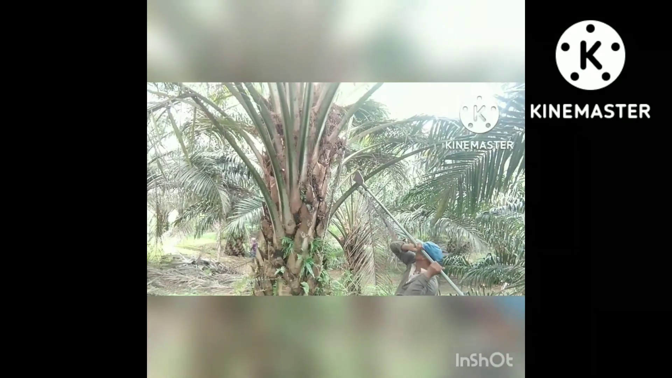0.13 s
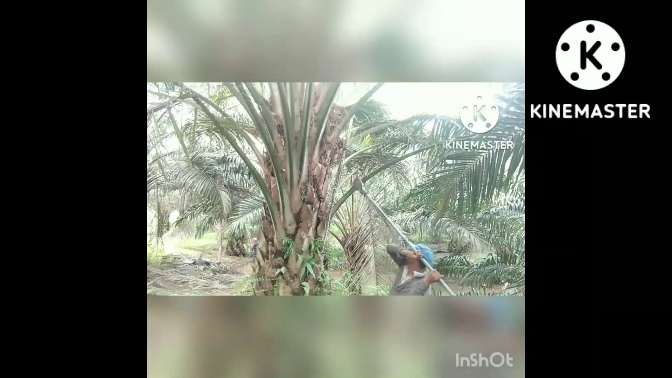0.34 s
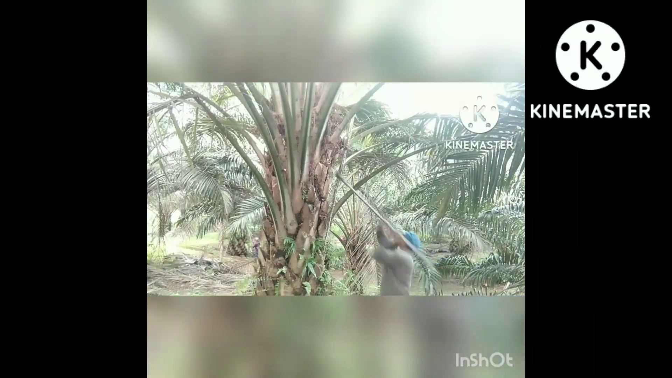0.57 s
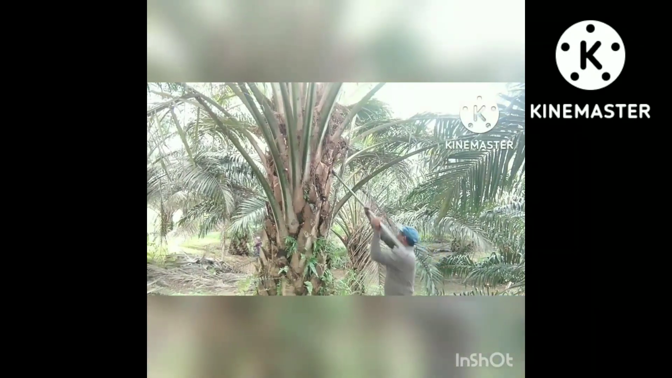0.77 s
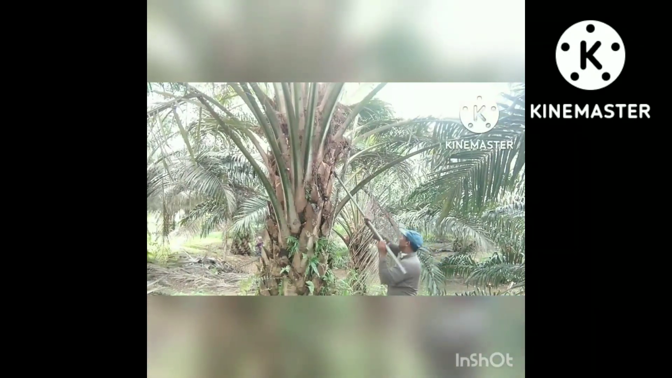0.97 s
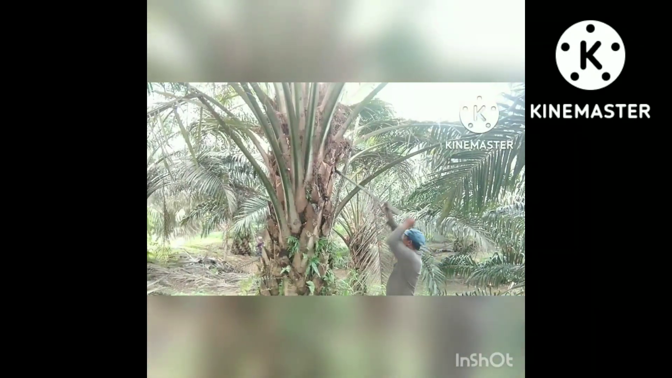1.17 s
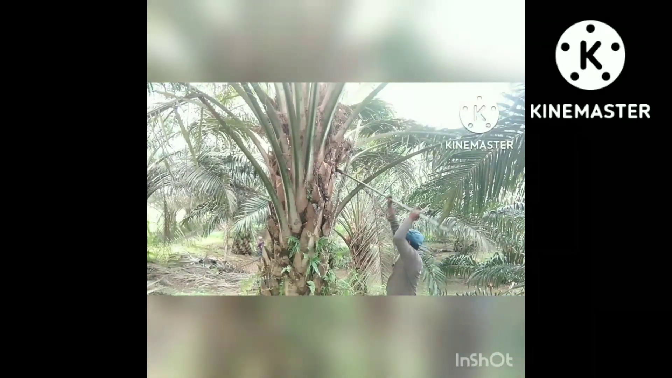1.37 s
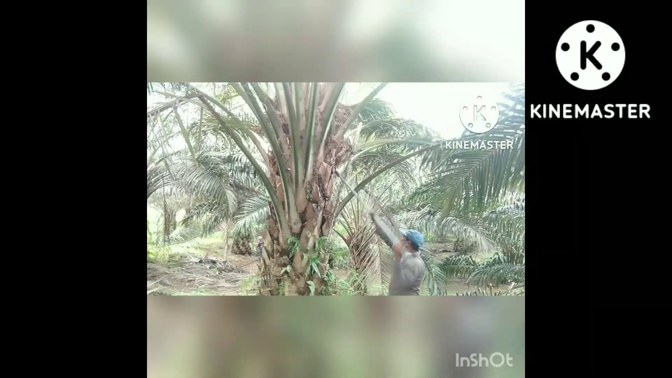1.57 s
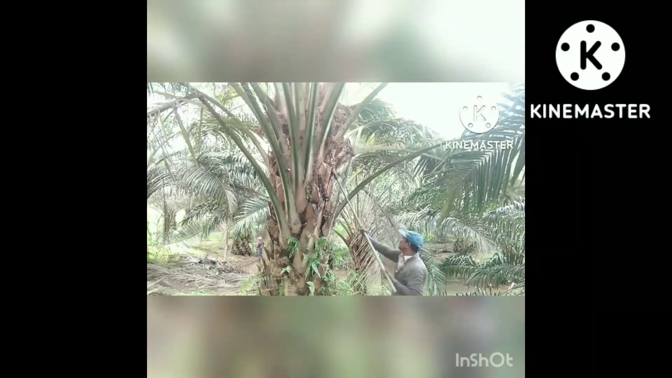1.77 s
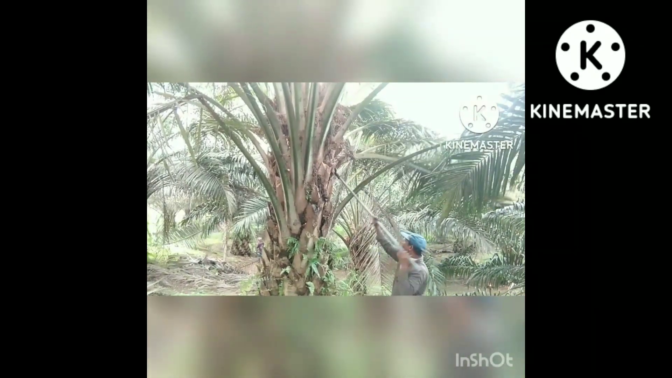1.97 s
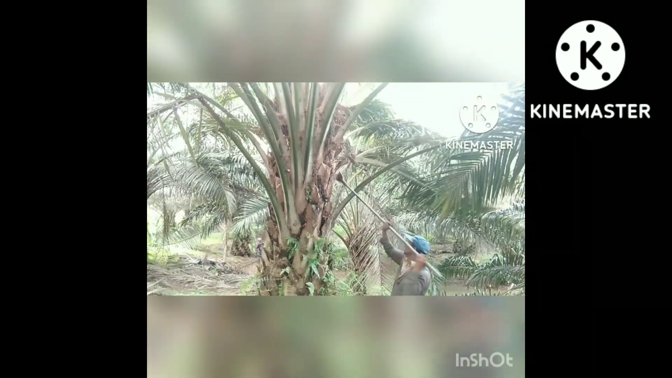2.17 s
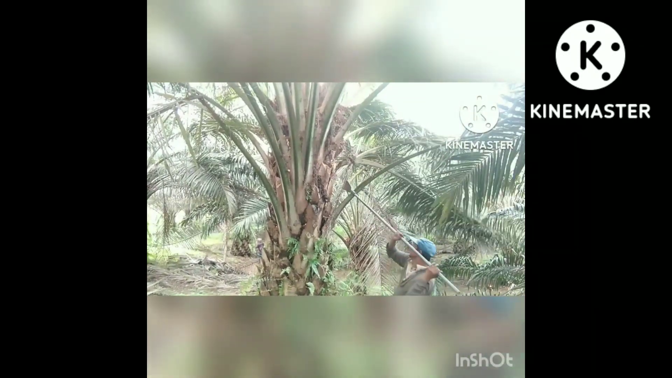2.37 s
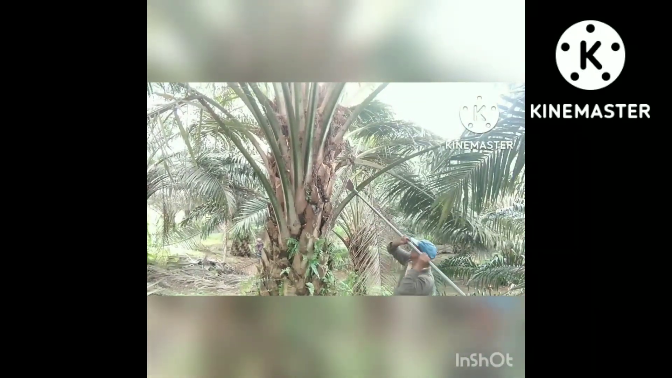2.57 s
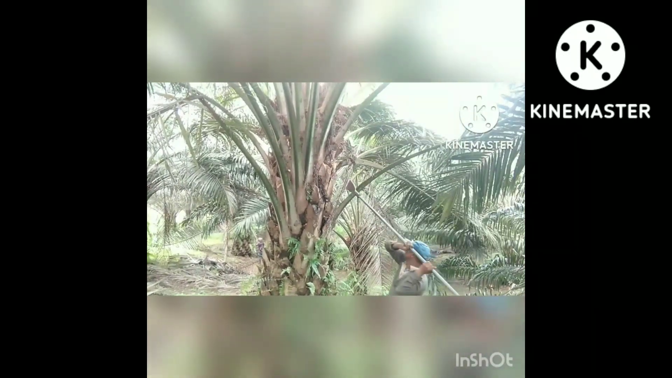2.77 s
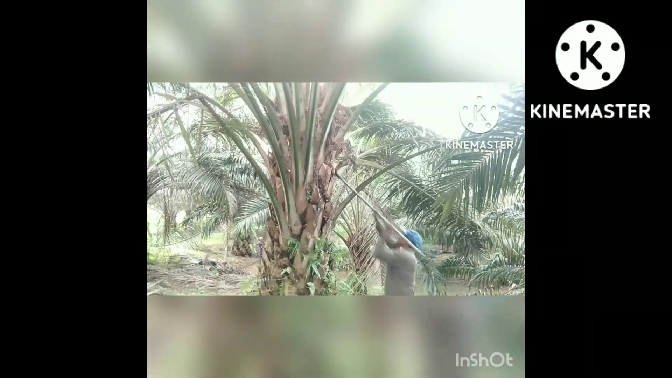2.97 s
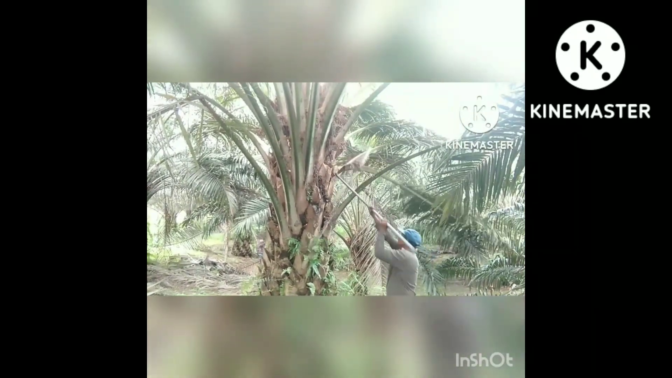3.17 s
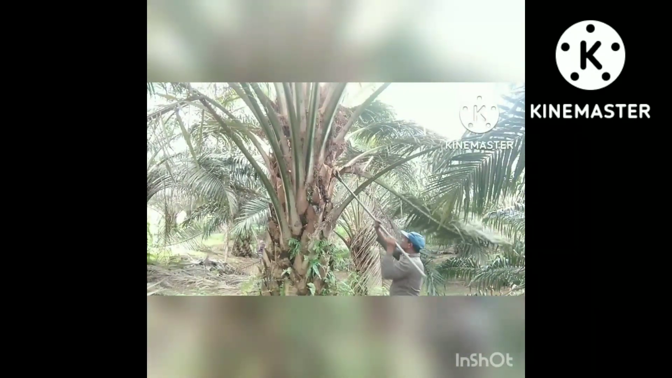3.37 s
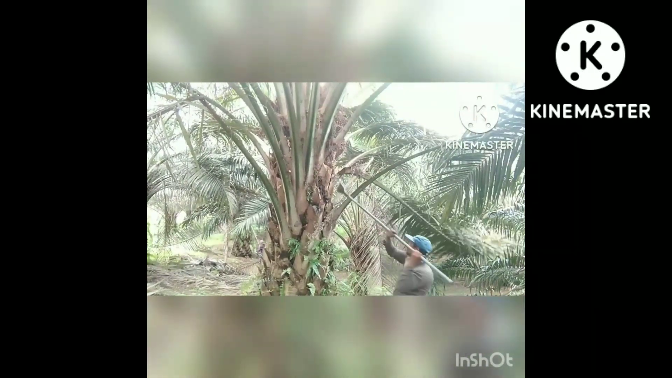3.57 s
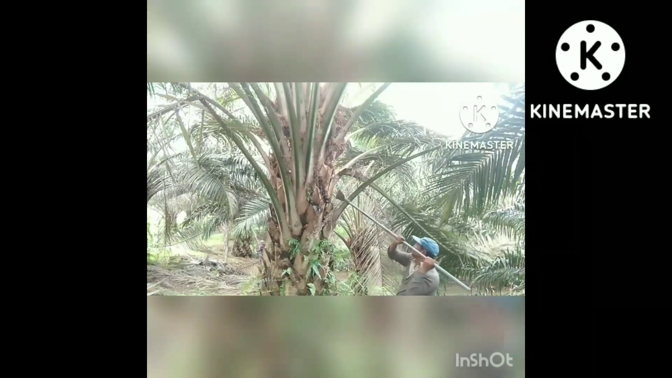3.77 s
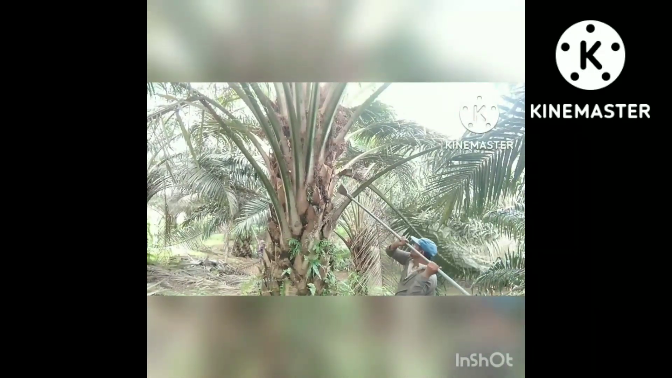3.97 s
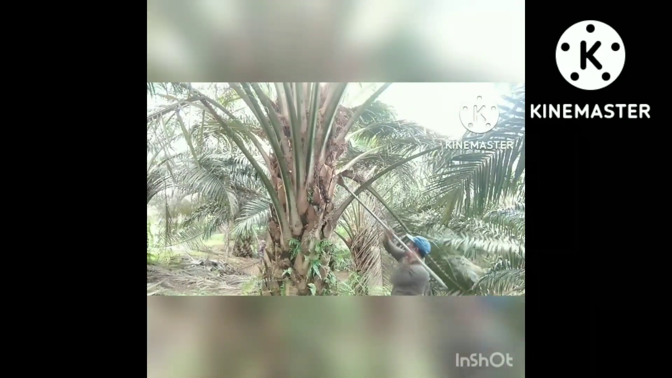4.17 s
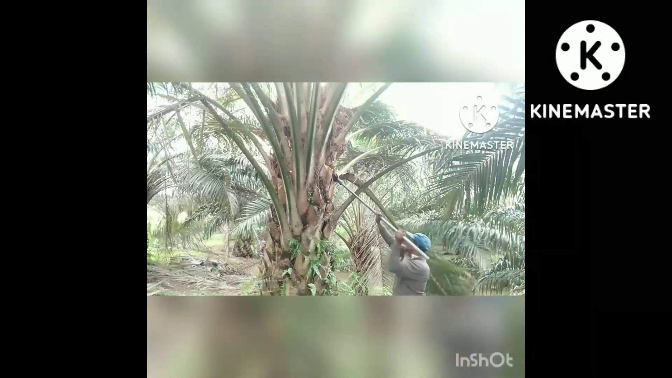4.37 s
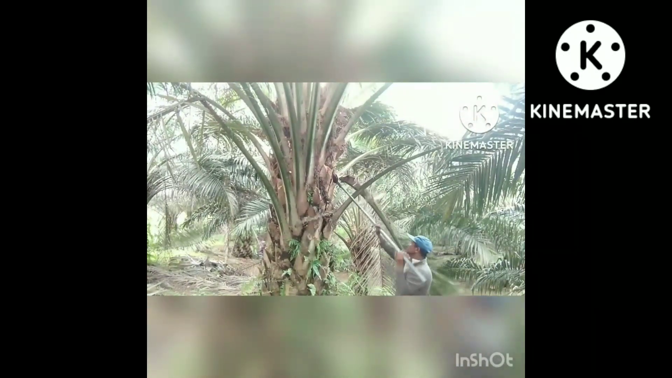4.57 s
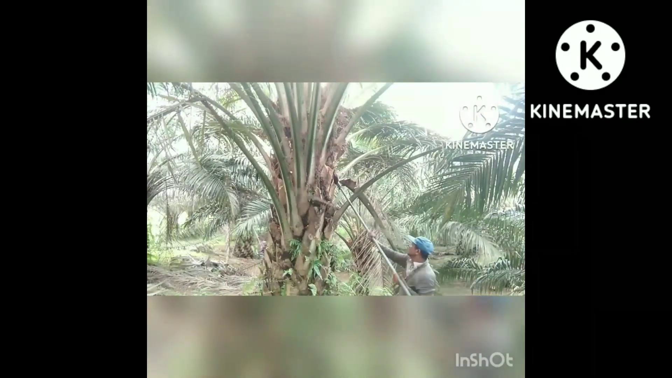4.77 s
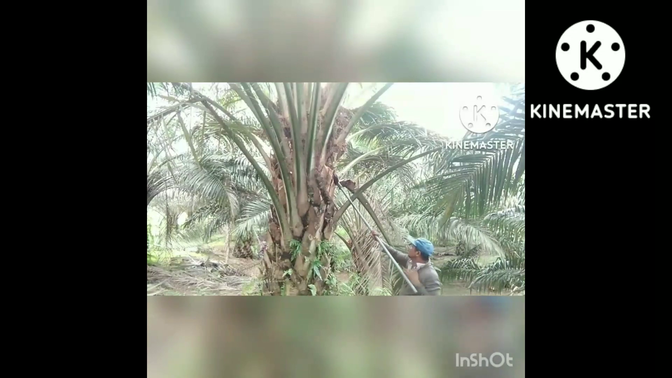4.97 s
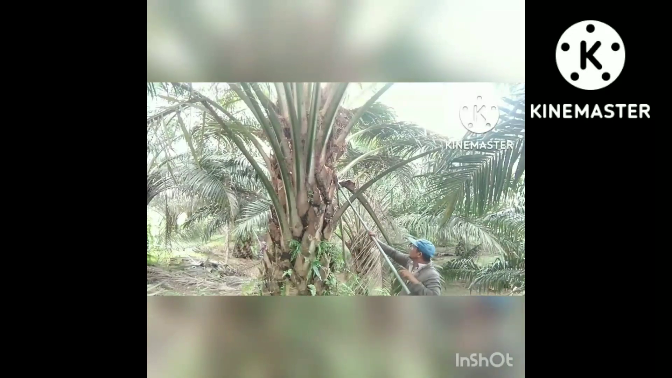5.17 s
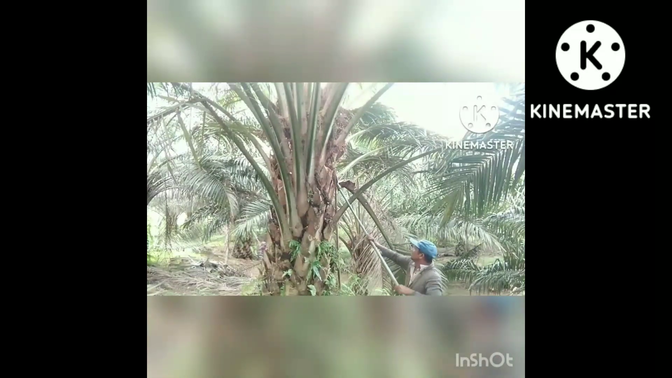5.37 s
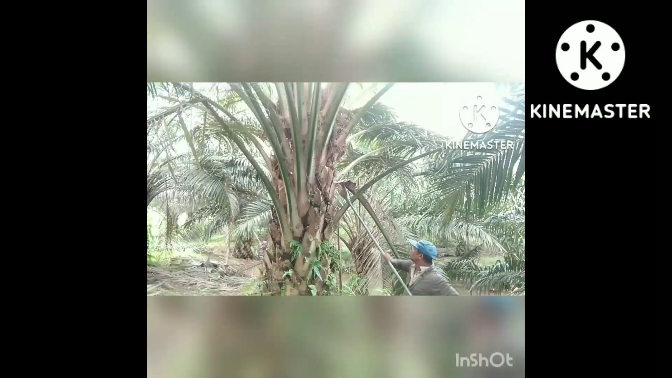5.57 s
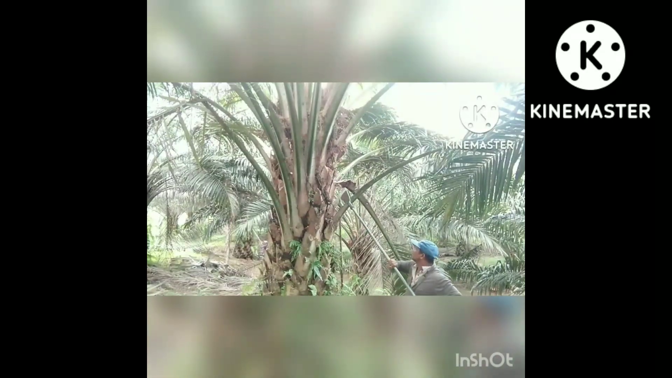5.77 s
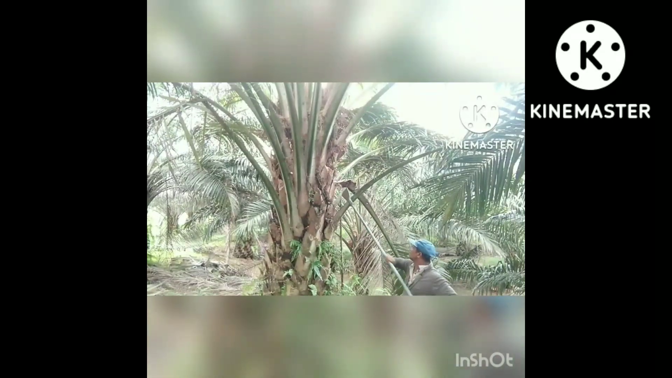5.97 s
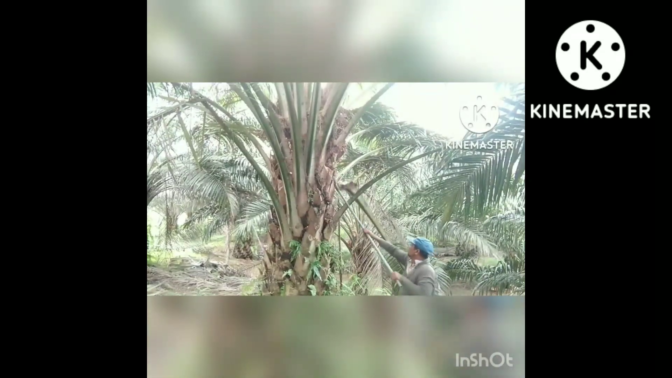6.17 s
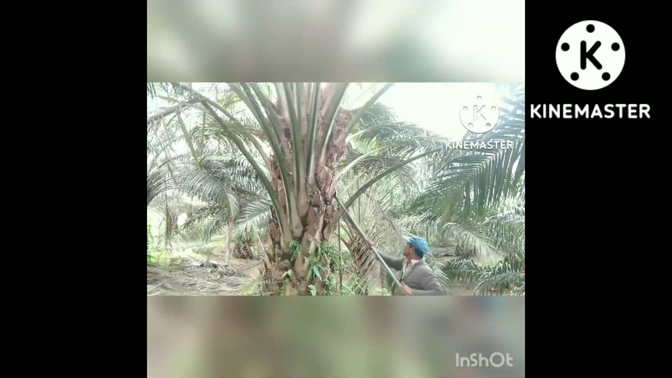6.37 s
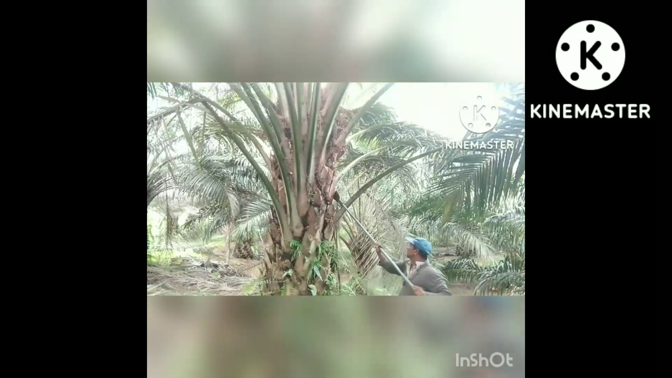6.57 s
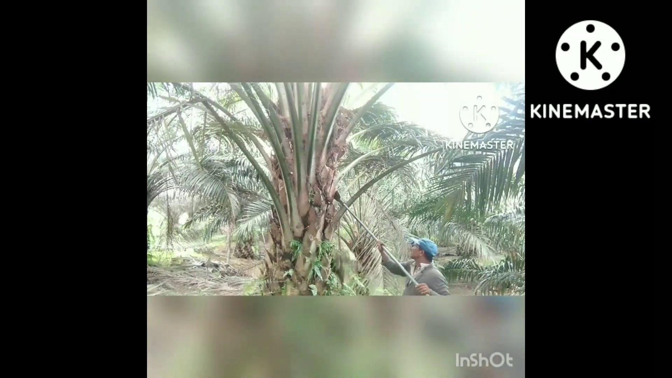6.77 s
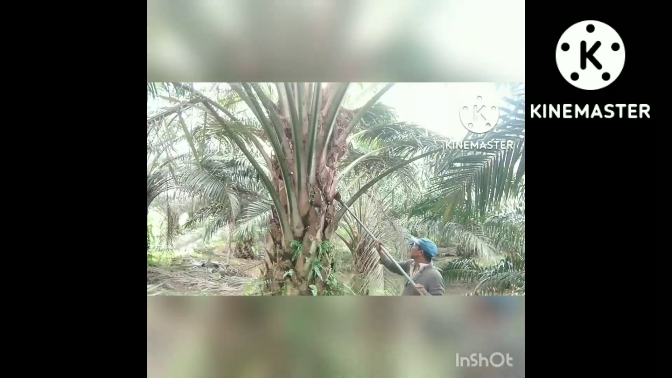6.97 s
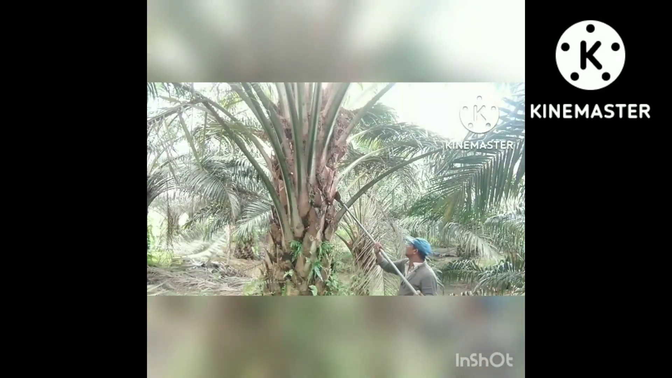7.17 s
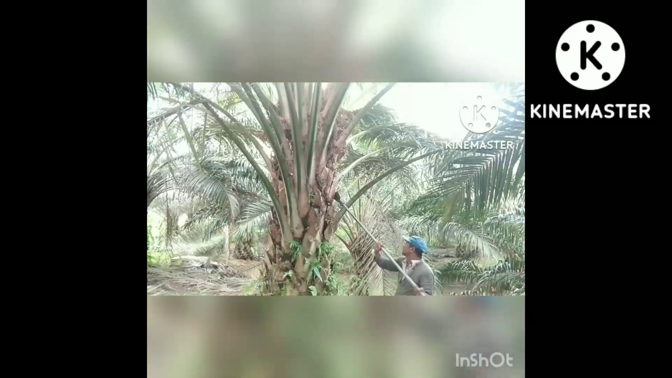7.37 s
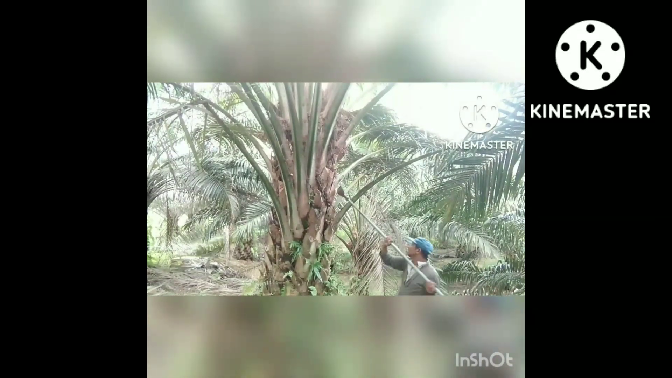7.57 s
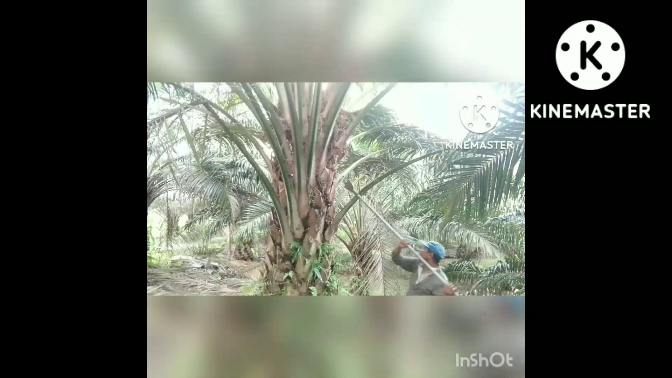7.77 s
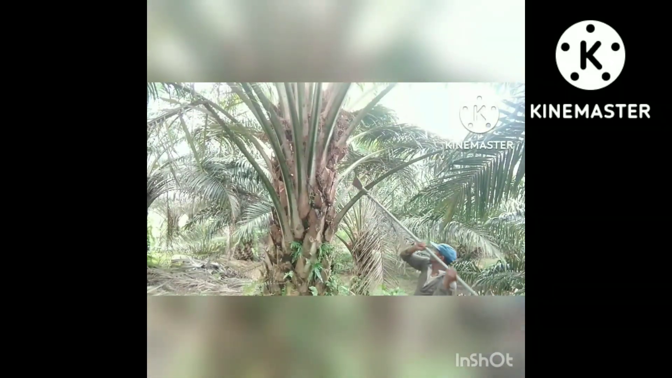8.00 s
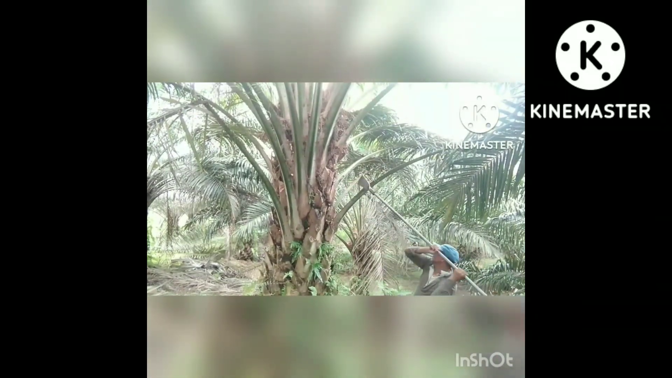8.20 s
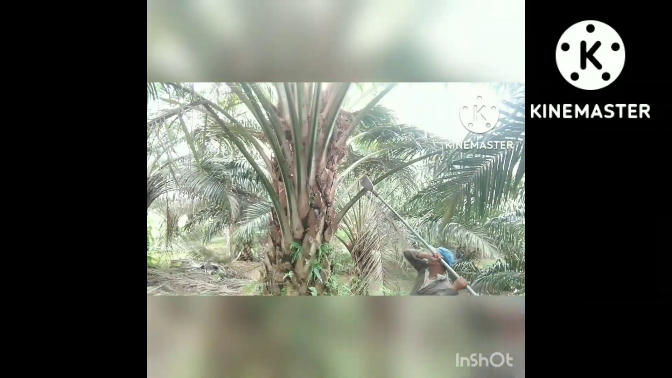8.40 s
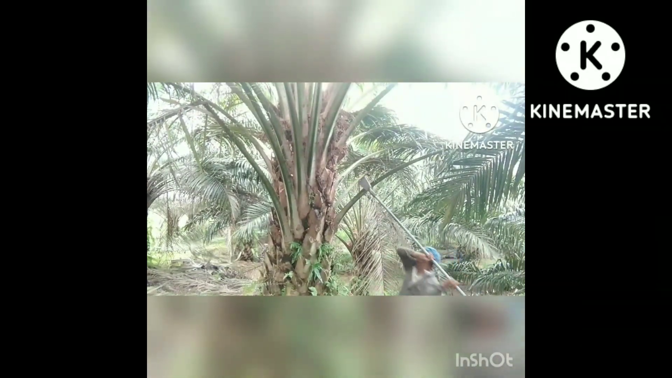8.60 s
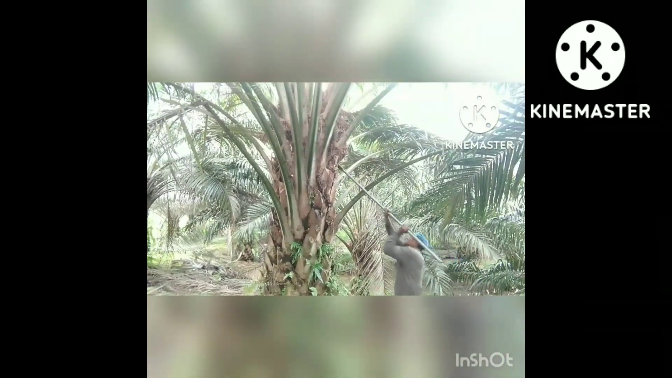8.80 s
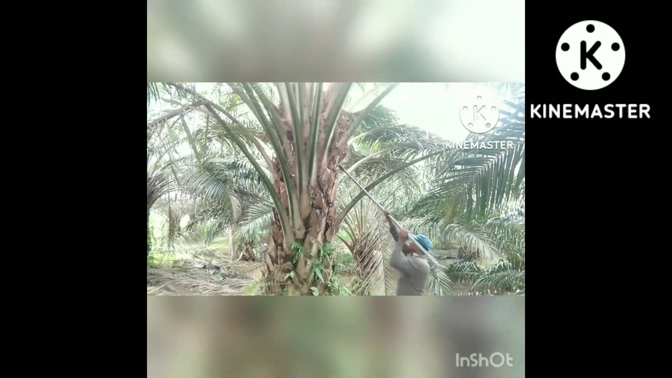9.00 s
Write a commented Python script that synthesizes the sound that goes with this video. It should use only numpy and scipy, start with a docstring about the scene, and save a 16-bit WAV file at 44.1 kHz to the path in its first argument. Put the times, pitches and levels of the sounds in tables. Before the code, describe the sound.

Irregular hacking at palm stalks: tearing cracks, hollow wooden knocks and bursts of crackly leaf rustle, with near-quiet gaps between.

```python
"""Chopping palm fronds

A sickle on a long pole chops palm fronds in a plantation, with insects, air and a low hum behind.
Stalks crack and tear as bursts of breaking fibres; pole and stalks knock as ringing wooden tones.
Dry leaflets rustle and crackle as hiss and tiny ticks while the fronds shake and fall.
A noise suppressor carves the steady bands out of the quiet moments, then the top is cut."""
import sys
import numpy as np
from scipy import signal
from scipy.fft import rfft, irfft, next_fast_len
from scipy.io import wavfile
from scipy.ndimage import uniform_filter1d

SR = 44100
rng = np.random.default_rng(int(sys.argv[2]) if len(sys.argv) > 2 else 0)


def int16_out(signal):
    """Quantize to a 16-bit WAV file."""
    q = np.round(np.clip(np.atleast_2d(signal).T, -1, 1) * 32767)
    wavfile.write(sys.argv[1], SR, q.astype(np.int16))


N = 398663   # length in samples


def amp(db):
    """Decibels to gain."""
    return 10 ** (np.asarray(db) / 20)


def rms_one(x):
    """Scale to unit rms, the average strength."""
    return x / np.sqrt(np.mean(x ** 2) + 1e-20)


def at_hz(points, hz):
    """Read a spectrum table in dB, with straight lines on a log-frequency axis."""
    table_hz, table_db = np.array(points).T[:2]
    return np.interp(np.log(np.maximum(hz, 1)), np.log(table_hz), table_db)


def level_curve(points):
    """Draw straight lines in dB through a (time, level) table, one value per sample."""
    return np.interp(np.arange(N) / SR, *np.transpose(points))


def split(x, order, hz):
    """Split a sound into the parts below and above a pitch."""
    return [signal.sosfilt(signal.butter(order, hz, side, fs=SR, output="sos"), x)
            for side in ("low", "high")]


def bandpass(x, order, edges):
    """Keep only what lies between two pitches."""
    return signal.sosfilt(signal.butter(order, edges, "band", fs=SR, output="sos"), x)


def colour(x, spectrum):
    """Shape a white signal by the spectrum of the table, at rms 1."""
    size = next_fast_len(N)
    gain = amp(at_hz(spectrum, np.fft.rfftfreq(size, 1 / SR)))
    return rms_one(irfft(rfft(x, size) * gain, size)[:N])


def drift(rate):
    """Slow random wander of spread about 1; a higher rate [Hz] wanders faster."""
    step = 40   # samples between the drawn points
    r = np.exp(-2 * np.pi * rate * step / SR)
    draws = rng.standard_normal(N // step + 2002)
    slow = signal.lfilter([1], [1, -2 * r, r * r], draws)[2000:]   # skip the start-up
    return np.interp(np.arange(N) / step, np.arange(len(slow)), rms_one(slow))


def ring(push, hz, t60):
    """Ring like a struck object: a unit click starts a sine of height 1 that falls 60 dB in t60 [s]."""
    r, w = amp(-60 / (t60 * SR)), 2 * np.pi * hz / SR
    return signal.lfilter([0, np.sin(w)], [1, -2 * r * np.cos(w), r * r], push + 1e-18)


def rustle(spectrum, per_s, spread_db, grain_share, flicker_db, cycles):
    """Rubbing hiss plus random ticks of uneven size, each ringing some cycles at one of eleven pitches."""
    sizes = amp(spread_db * np.minimum(rng.exponential(1, N), 4)) * rng.choice([-1, 1], N)
    chance = per_s * amp(5 * drift(14)) / SR   # the ticks come in denser and thinner patches
    ticks = sizes * (rng.random(N) < chance)
    pitches, dealt = np.geomspace(200, 15000, 11), rng.integers(0, 11, N)
    # higher pitches cover wider bands, so they are louder to keep the sum white
    rings = sum(hz * ring(ticks * (dealt == k), hz, cycles / hz) for k, hz in enumerate(pitches))
    hiss = np.sqrt(1 - grain_share) * rng.standard_normal(N)
    white = hiss + np.sqrt(grain_share) * rms_one(rings)
    return colour(white * amp(flicker_db * drift(18.0)), spectrum)


# tone of the far low hum: (frequency [Hz], relative level [dB per Hz])
RUMBLE = [(45, -13), (75, 1), (110, -7.5), (170, -32.5)]


def far_hum():
    """A far low hum: deep noise whose strength wanders slowly."""
    hum = colour(rng.standard_normal(N) * amp(2.0 * drift(6.9)), RUMBLE)
    return amp(-75.5) * hum


# tone of insects and air, also the profile the suppressor has learnt:
# (frequency [Hz], relative level [dB per Hz])
AMBIENCE = [(100, -28), (200, 2), (350, 5.5), (600, -5), (1000, -5), (1700, -2), (2400, -15), (4500, -10.5),
            (5000, -5.5), (5600, 2.5), (6200, -1), (6900, 11.5), (7400, 2.5), (7800, -4.5), (10000, -16.5)]
AMBIENCE_DB = -60.5


def insects_and_air():
    """Insects and air: steady noise, strong in the bands of the table."""
    return amp(AMBIENCE_DB) * colour(rng.standard_normal(N), AMBIENCE)


# tone of the trunk and ground shudder: (frequency [Hz], relative level [dB per Hz])
BOOM = [(30, -35.5), (65, -3.5), (110, -5.5), (170, -5.5), (260, -29)]
BOOM_RISE_S, BOOM_T60_S, DRAG_BOOM_DB = 0.13, 0.33, -20   # rise, decay; level under the scrape


def boom():
    """The deepest part of each chop builds up late and lasts; dragged stalks keep it stirring."""
    t = np.arange(N) / SR
    level = amp(level_curve(STALKS) + DRAG_BOOM_DB)
    for s, db, hold, t60, thud_db, boom_db, wood_db in CHOPS:
        since = np.maximum(t - s, 0)
        rise = 1 - np.exp(-since / BOOM_RISE_S)
        level = level + rise * amp(boom_db - 60 * np.maximum(since - hold, 0) / BOOM_T60_S)
    return level * colour(rng.standard_normal(N) * amp(2.5 * drift(9.0)), BOOM)


# tone of the low scrape: (frequency [Hz], relative level [dB per Hz])
STALK_TONE = [(100, -39.5), (200, -8.5), (350, 0.5), (550, -2), (800, -4.5), (1400, -3.5), (2500, -14),
              (5000, -20)]
# strength of the scrape of stalks dragged past trunk and ground: (time [s], level [dB])
STALKS = [(0.0, -57), (0.05, -51.5), (0.28, -65.5), (0.74, -57.5), (1.03, -59), (1.2, -59.5), (1.4, -51),
          (2.0, -58.5), (2.4, -64.5), (2.9, -71.5), (3.09, -60), (3.13, -53.5), (3.6, -55.5), (4.1, -59),
          (4.6, -50), (5.1, -59), (5.57, -65), (5.7, -73), (6.1, -71.5), (6.15, -47.5), (6.22, -50),
          (6.3, -64.5), (6.7, -48.5), (7.2, -49), (7.52, -58), (7.6, -68.5), (8.4, -67), (8.6, -77),
          (8.89, -61.5), (9.04, -59.5)]
STALK_WANDER_DB = 1.5   # unevenness of the scrape
SCRAPE_DB, SCRAPE_T60_S = -5.5, 0.051   # scrape after a knock: level under it before smoothing, decay


def dragged_stalks():
    """Stalks scrape as low rubbing noise, and a knocked stalk scrapes on for a moment."""
    knocked = np.zeros(N)
    for s, db, hz in KNOCKS:
        knocked[round(s * SR)] = amp(db + SCRAPE_DB)
    after = signal.lfilter([1], [1, -amp(-60 / (SCRAPE_T60_S * SR))], knocked + 1e-18)
    after = uniform_filter1d(after, size=600, origin=299)   # the scrape sets in over some 14 ms
    scrape = amp(level_curve(STALKS) + STALK_WANDER_DB * drift(15.0)) + after
    return scrape * rustle(STALK_TONE, per_s=1200, spread_db=0.5, grain_share=0.42,
                           flicker_db=2.0, cycles=5.4)


# tone of the leaflets: (frequency [Hz], relative level [dB per Hz])
LEAFLETS = [(180, -23.5), (300, 0.5), (447, -8.5), (546, -30), (762, -6.5), (1170, -3.5), (2440, 1.5),
            (3030, -1), (4160, 1.5), (5900, 1.5), (7820, 6.5), (15000, -28.5)]
# how hard the fronds are shaken, as the level of their leaflets; one list for each bout:
# (time [s], level [dB])
FRONDS = [
    [(0.0, -57), (0.04, -43.5), (0.12, -44.5), (0.28, -56), (0.588, -60), (0.74, -58.5)],
    [(0.76, -27.5), (0.83, -44), (0.91, -51), (1.17, -51.5), (1.26, -40), (1.6, -39), (1.77, -46),
     (2.15, -43), (2.27, -37.5), (2.4, -48), (2.78, -50.5), (3.09, -60.5)],
    [(3.11, -30.5), (3.34, -43.5), (3.95, -46.5), (4.3, -40.5), (4.52, -40.5), (4.62, -35.5), (4.92, -43.5),
     (5.18, -47.5), (5.57, -53.5), (5.62, -48), (5.74, -53.5), (5.82, -70.5), (5.92, -92)],
    [(5.94, -51.5), (6.03, -69), (6.104, -93.5), (6.14, -49.5), (6.194, -43), (6.24, -32)],
    [(6.32, -38.5), (6.68, -41.5), (6.85, -37), (7.12, -35), (7.52, -44), (7.6, -49.5), (8.21, -50.5),
     (8.45, -47), (8.6, -46), (8.89, -51)],
    [(8.92, -32.5), (9.04, -52.5)],
]
# stiff midribs join the rustle or leave it to the thin tips; extra level below the split:
# (time [s], level [dB])
MIDRIBS = [(0, 8), (0.1, -0.5), (0.3, 1.5), (0.7, 2.5), (1.2, -3), (1.8, -3.5), (2.12, -7), (2.17, -4.5),
           (2.42, -4.5), (2.9, -3), (3.12, -8), (3.3, -5.5), (3.45, 1.5), (4.0, -5.5), (4.6, -3), (5.3, -3),
           (5.7, -3.5), (5.86, -14), (5.96, 1), (6.3, 3), (6.55, -8), (6.9, -4), (7.3, -5), (7.7, -4),
           (8.3, -6), (8.45, -2), (8.9, -3.5)]
SPLIT_HZ, PATCHY_DB = 3280, 1.5   # each part also swells and fades by itself


def leaflets():
    """Dry leaflets hiss and tick: stiff midribs sound below the split and thin tips above."""
    leaves = rustle(LEAFLETS, per_s=1500, spread_db=2.8, grain_share=0.3, flicker_db=1.0, cycles=16)
    ribs, tips = split(leaves, 4, SPLIT_HZ)
    ribs = amp(level_curve(MIDRIBS) + PATCHY_DB * drift(14.0)) * ribs
    tips = amp(PATCHY_DB * drift(5.1)) * tips
    return amp(level_curve(np.concatenate(FRONDS))) * (ribs + tips)


# the steel after a tap:
# (time [s], level [dB], pitch [Hz], decay by 60 dB [s], time when damped [s])
BLADE_RING = [(5.6, -61, 1669, 2.0, 5.935)]


def blade():
    """The steel blade rings thinly until it touches wood again."""
    s, db, hz, t60, damped = BLADE_RING[0]
    tap = np.zeros(N)
    tap[round(s * SR)] = amp(db)
    touch = np.exp(-np.maximum(np.arange(N) / SR - damped, 0) / 0.0032)
    return ring(tap, hz, t60) * touch


# hollow knocks of pole and stalk: (time [s], peak level before the band filter [dB], pitch [Hz])
KNOCKS = [(0.052, -43, 590), (0.751, -22.5, 338), (1.071, -43.5, 312), (1.105, -43, 358),
          (1.371, -28.5, 307), (1.504, -37, 391), (1.569, -38, 410), (1.742, -31.5, 423), (1.959, -47, 444),
          (2.03, -38, 313), (2.085, -46, 452), (2.194, -44, 303), (2.243, -42, 330), (2.266, -41, 420),
          (2.377, -43, 418), (2.553, -48, 413), (2.654, -39.5, 351), (2.767, -48, 420), (2.834, -47, 417),
          (3.104, -27, 302), (3.142, -21, 251), (3.32, -45, 224), (3.403, -33.5, 234), (3.645, -47, 350),
          (3.743, -40, 336), (4.229, -45, 340), (4.381, -34.5, 264), (4.538, -47, 346), (5.208, -52.5, 533),
          (5.412, -42.5, 460), (5.597, -42.5, 352), (5.935, -41.5, 311), (6.244, -22.5, 444),
          (6.287, -35.5, 231), (6.419, -36.5, 314), (6.493, -32.5, 274), (6.521, -28, 298),
          (6.69, -30.5, 430), (6.764, -45, 370), (6.942, -34, 435), (7.186, -37.5, 424), (7.215, -36, 286),
          (7.292, -38, 437), (8.698, -52.5, 304), (8.985, -47, 293)]
# ringing tones within each knock: (pitch as a ratio to the knock's pitch, relative level [dB])
KNOCK_MODES = [(1.027, 10.5), (1.2, -7), (1.4, -14)]
KNOCK_T60_S = 0.045   # ring of a knock


def knocks():
    """A short rough contact rings the wooden tones, scaled to the pitch of each knock."""
    out, t = np.zeros(N), np.arange(int(.2 * SR)) / SR
    contact = (1 - np.exp(-t / 0.00083)) * np.exp(-t / 0.012)
    pushes = rng.standard_normal((len(KNOCKS), len(t))) * contact
    for (s, db, hz), push in zip(KNOCKS, pushes):
        body = sum(amp(m) * ring(push, hz * k, KNOCK_T60_S) for k, m in KNOCK_MODES)
        i = round(s * SR)
        out[i:i + len(t)] += amp(db) * body[:N - i] / np.abs(body).max()
    return bandpass(out, 2, [150, 900])


# fibres snapping:
# (time [s], relative level of the spray of small breaks [dB], centre pitch [Hz],
#  first snap over the spray [dB])
CRACKS = [(0.042, -21, 1400, -7), (0.075, -17.5, 1080, -9), (0.116, -23, 1990, 0), (0.1355, -31, 2800, 6),
          (0.731, -24, 2470, 0), (1.075, -30, 1430, 7), (1.1072, -24, 1440, 5.5), (1.16, -25.5, 2880, 3),
          (1.2585, -21.5, 1720, 3), (1.3571, -13.5, 4400, 10), (1.3605, -22, 4000, 15),
          (1.3663, -19, 3800, 21), (1.3734, -10, 2730, 13), (1.3763, -28, 4000, 23),
          (1.5038, -11.5, 1950, -5), (1.5694, -17.5, 2430, 3.5), (1.7423, -12, 3720, 10.5),
          (2.039, -24, 4830, 13.5), (2.154, -16, 5200, 10), (2.189, -14, 5740, 6), (2.195, -29, 1780, 13.5),
          (2.26, -24, 1730, 7), (2.2712, -21.5, 4600, 16.5), (2.36, -19, 5600, -16), (2.417, -27, 4200, 10),
          (2.638, -17.5, 1710, -2.5), (2.642, -15.5, 7700, -16), (3.138, -15, 3650, 13),
          (3.196, -19, 3560, 5), (3.21, -19, 3530, 8), (3.231, -19, 4030, 9), (3.3514, -17.5, 3320, 3.5),
          (3.3929, -19.5, 7400, 13.5), (3.484, -16.5, 2070, -3), (3.6473, -17.5, 4300, -4),
          (3.7397, -24.5, 1660, 2), (3.8032, -34, 3770, 26.5), (3.8458, -23.5, 7400, 17.5),
          (3.9828, -22, 8500, 3), (4.213, -21.5, 4350, 8), (4.2261, -19.5, 7900, 20),
          (4.2833, -27, 3630, 17), (4.4827, -25, 3670, 22.5), (4.7818, -36, 2900, 27),
          (4.867, -20.5, 2540, -2), (5.045, -28.5, 1770, 4), (5.07, -32, 1800, 8), (5.156, -22, 7100, 12),
          (5.16, -26.5, 1620, 9), (5.4009, -19.5, 1450, -24), (5.5982, -15.5, 1380, 4.5),
          (5.693, -28.5, 3200, 9), (5.9355, -16, 1154, 3), (6.049, -30, 696, -2), (6.606, -16, 8900, -15),
          (6.938, -22, 3800, 10), (6.9512, -19, 4180, 17.5), (7.042, -9, 1250, 0), (7.0968, -21, 3030, 13),
          (7.1247, -25, 7660, 20), (7.1665, -36, 3060, 26), (7.1802, -18.5, 2670, 10), (7.21, -13, 3540, 7),
          (7.2405, -14, 4240, 15.5), (7.2541, -13.5, 2970, 11.5), (7.2923, -13, 2550, 1),
          (7.304, -16.5, 6500, 17), (7.307, -27.5, 1820, 17), (7.413, -18.5, 930, -12),
          (7.448, -21.5, 7300, 14), (7.4765, -14, 3460, 3.5), (7.515, -23.5, 3000, -2),
          (7.77, -26, 1200, -15), (8.905, -15.5, 4640, 18.5), (8.9124, -4, 3550, 0)]
LUMPY_DB = 2.2   # the spray comes in uneven lumps
SNAP_CYCLES = 31.7   # a snapped splinter falls 60 dB in this many cycles
SPRAY_T60_S, SPRAY_LONGER_PER_OCTAVE = 0.094, 0.85   # decay at 3 kHz; growth exponent per octave up
GROVE_T60_S, GROVE_DB = 0.32, -6.5   # scatter from the grove: decay, level under the spray


def cracks():
    """A snap rings at the centre pitch, with a dying spray of breaks and the scatter of the grove."""
    out, t = np.zeros(N), np.arange(int(.3 * SR)) / SR
    draws = rng.standard_normal((len(CRACKS), len(t)))
    lumps = np.repeat(rng.standard_normal((len(CRACKS), len(t) // 64 + 1)), 64, axis=1)[:, :len(t)]
    draws = draws * amp(LUMPY_DB * (t > .003) * lumps)   # the first 3 ms stay even
    scatter, click = amp(GROVE_DB - 60 * t / GROVE_T60_S), 1.0 * (t == 0)
    for (s, db, hz, snap_db), noise in zip(CRACKS, draws):
        edges = [hz / 1.74, min(hz * 2.5, .45 * SR)]
        # brighter sprays run into the leaflets and last longer
        t60 = SPRAY_T60_S * np.exp(SPRAY_LONGER_PER_OCTAVE * np.log2(hz / 3000))
        first_snap = amp(snap_db) * np.exp(-t / 0.00075)
        burst = bandpass(noise * (amp(-60 * t / t60) + scatter + first_snap), 4, edges)
        burst += amp(snap_db + 1.0) * ring(click, hz, SNAP_CYCLES / hz)
        i = round(s * SR)
        out[i:i + len(t)] += amp(db - 15.5) * burst[:N - i]
    return bandpass(out, 3, [450, 9000])


# the blade tears through a stalk; levels are those before rise and decay:
# (time [s], tear level [dB], tearing time [s], decay by 60 dB after it [s], thud level [dB],
#  shudder level [dB], extra level of the woody part below the split [dB])
CHOPS = [(0.745, -21, 0.018, 0.21, -28.5, -35.5, 3), (1.369, -14.5, 0.0033, 0.065, -22, -67, 8),
         (3.099, -23.5, 0.082, 0.3, -39, -41.5, -3), (4.375, -18, 0.0056, 0.13, -24.5, -38, -7),
         (6.229, -20.5, 0.0079, 0.2, -24, -32.5, 4), (8.907, -17.5, 0.0029, 0.11, -12, -38, 4.5)]
# tone of the tearing fibres: (frequency [Hz], relative level [dB per Hz])
TEAR = [(350, -39.5), (600, -14), (1070, -2), (2370, -1), (3160, -3), (3680, 3.5), (5710, -3.5),
        (7210, 5.5), (15000, -32)]
# tone of the trunk's thud: (frequency [Hz], relative level [dB per Hz])
THUD = [(40, -35), (135, -20.5), (231, 3), (387, -6), (455, -9), (623, -8.5), (1040, -45.5)]
# blade and pole ring along with the tear: (pitch [Hz], drive level [dB], decay by 60 dB [s])
STEEL = [(2505, -39, 0.077), (3720, -34, 0.023), (4810, -39.5, 0.11), (6240, -38, 0.015),
         (1226, -44.5, 0.12)]
WOODY_T60_SHARE, WOODY_HZ = 0.43, 2610   # the low part of a tear, below this split, dies sooner


def chops():
    """Dense fibre breaks while the blade tears, then a decay; the trunk's thud swells more slowly."""
    t, tear, wood, thud = np.arange(N) / SR, 0, 0, 0
    for s, db, hold, t60, thud_db, boom_db, wood_db in CHOPS:
        since = np.maximum(t - s, 0)
        sag_db = 60.0 * since   # fewer fibres are left to break as the tear goes on
        tearing = (1 - np.exp(-since / 0.0045)) * amp(db - sag_db)
        fall_db = 60 * np.maximum(since - hold, 0) / t60
        tear = tear + tearing * amp(-fall_db)
        wood = wood + tearing * amp(wood_db - fall_db / WOODY_T60_SHARE)
        thud = thud + (1 - np.exp(-since / 0.023)) * amp(thud_db - fall_db / 0.74)
    fibres = rustle(TEAR, per_s=1500, spread_db=2.2, grain_share=0.5, flicker_db=2.0, cycles=12)
    low, high = split(fibres, 3, WOODY_HZ)
    torn = tear * high + wood * low
    steel = sum(amp(db) * ring(torn, hz, t60) for hz, db, t60 in STEEL)
    return torn + steel + thud * colour(rng.standard_normal(N), THUD)


def scene():
    """All sources add up at one microphone."""
    background = far_hum() + insects_and_air() + boom()
    fronds = dragged_stalks() + leaflets()
    return (background + fronds + blade() + knocks() + cracks() + chops())[None]


def suppress(x, over_db, floor_db, smooth):
    """Turn each band down as its smoothed power nears the learnt ambience profile."""
    hz, _, spec = signal.stft(x, SR, nperseg=1024, noverlap=768, scaling="psd")
    shape = amp(2 * at_hz(AMBIENCE, hz))   # doubled dB gives power
    density = shape / (2 * np.sum(shape) * hz[1])
    learnt = amp(2 * (AMBIENCE_DB + over_db)) * density * (hz > 130)   # the lowest bands stay open
    power = uniform_filter1d(np.abs(spec) ** 2, size=5, axis=0)
    # only a clear rise opens a band at once; else the gain drifts with the smoothed power
    smoothed = signal.lfilter([1 - smooth], [1, -smooth], power, axis=1)
    power = np.maximum(amp(-6.5) * power, smoothed)
    gain = np.maximum(1 - learnt[:, None] / (power + 1e-20), amp(floor_db))
    gain = uniform_filter1d(gain, size=3, axis=1)
    return signal.istft(spec * gain, SR, nperseg=1024, noverlap=768, scaling="psd")[1][:N]


def record(dry):
    """Noise suppression, then a steep filter cuts the top."""
    clean = suppress(dry[0], over_db=6.5, floor_db=-22, smooth=0.846)
    top_cut = signal.cheby2(14, 45, 15900, fs=SR, output="sos")   # 45 dB down from 15900 Hz up
    return signal.sosfilt(top_cut, clean)[None]


dry = scene()
out = record(dry)
int16_out(out)
```